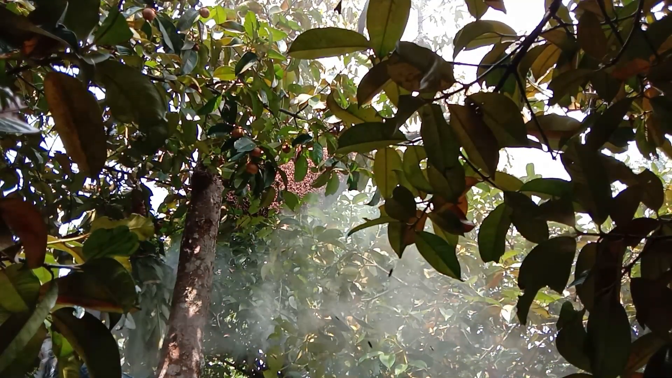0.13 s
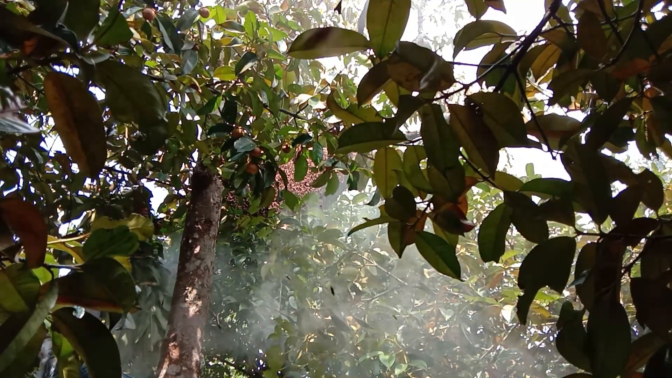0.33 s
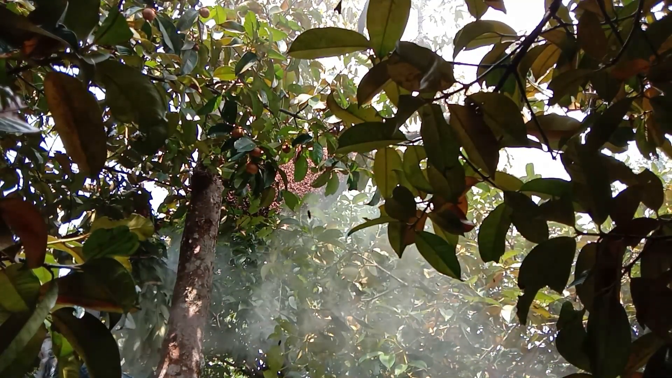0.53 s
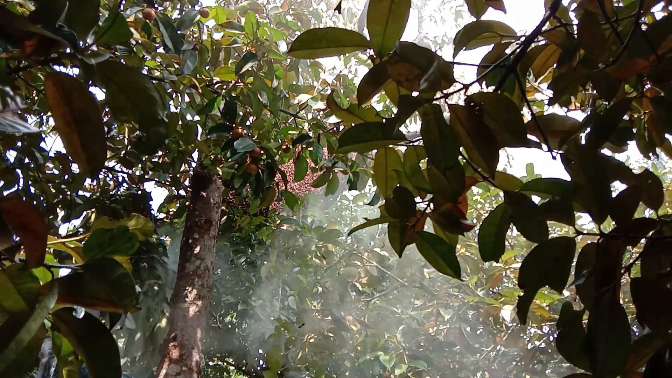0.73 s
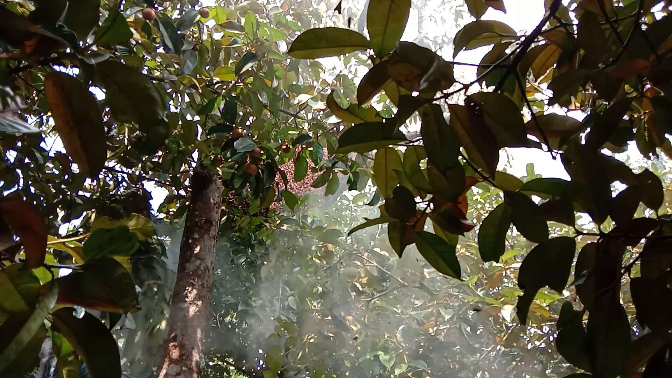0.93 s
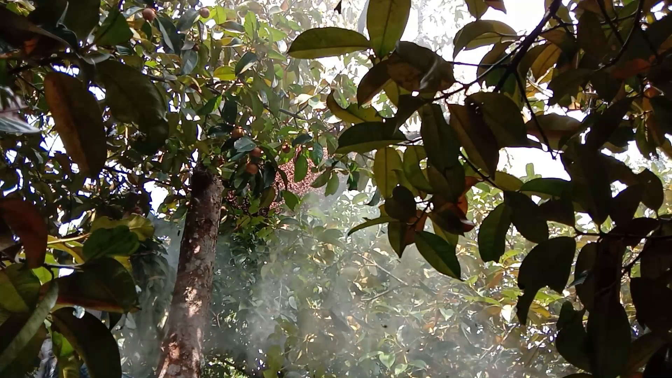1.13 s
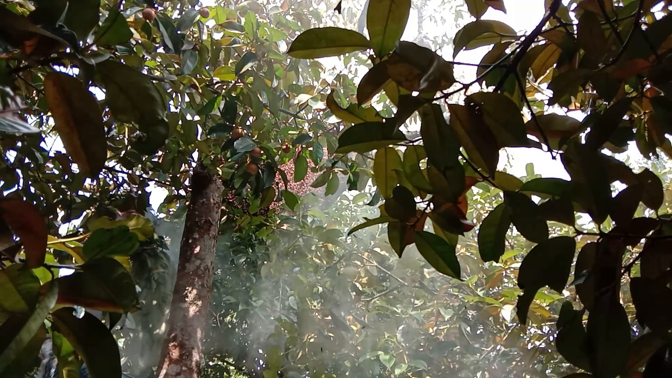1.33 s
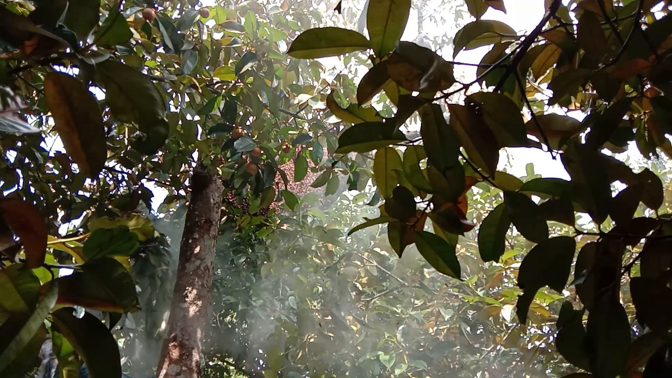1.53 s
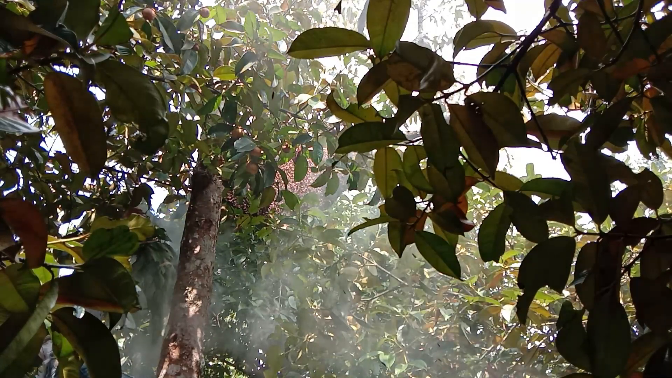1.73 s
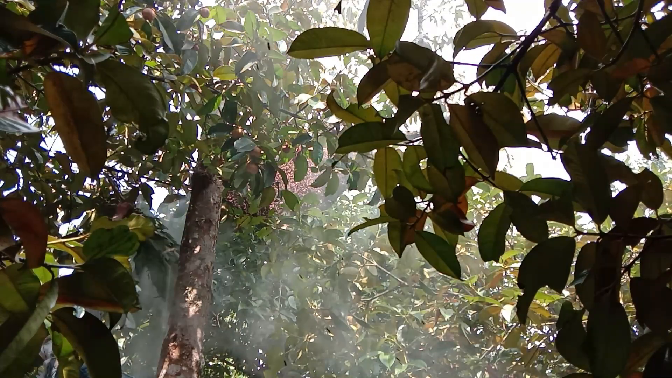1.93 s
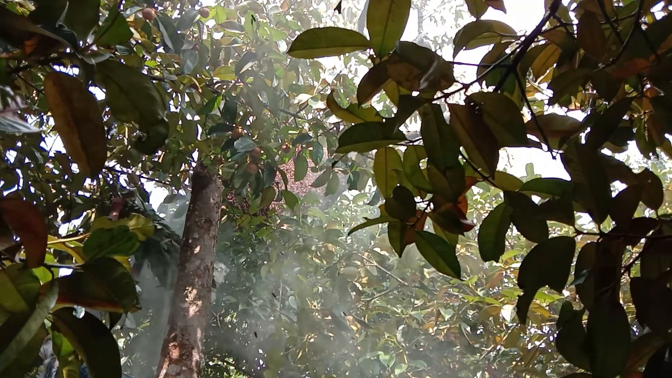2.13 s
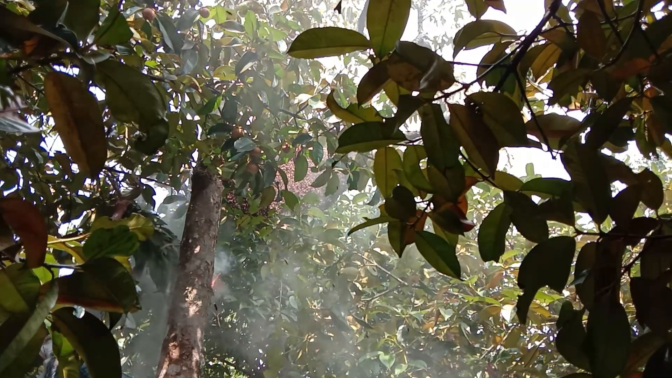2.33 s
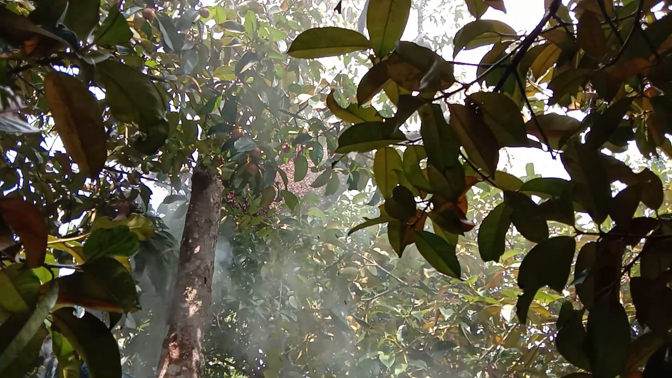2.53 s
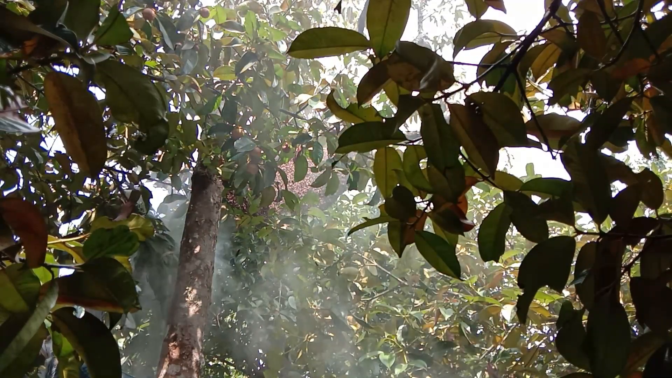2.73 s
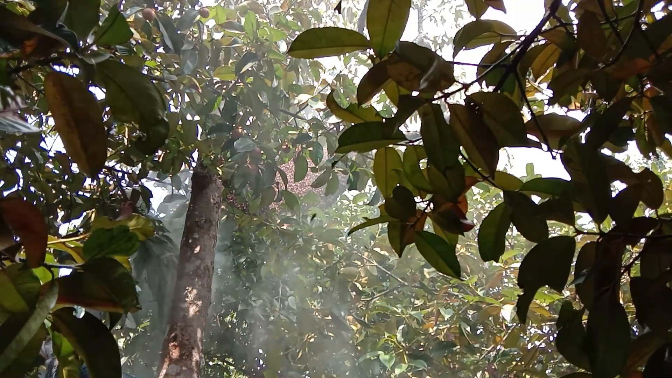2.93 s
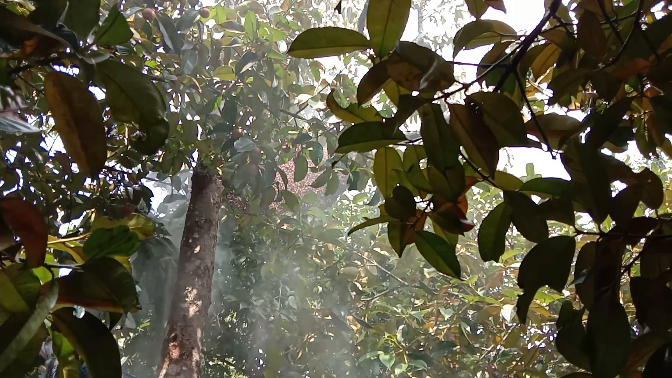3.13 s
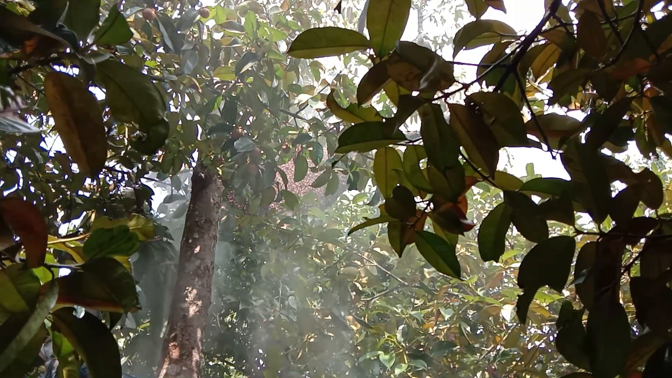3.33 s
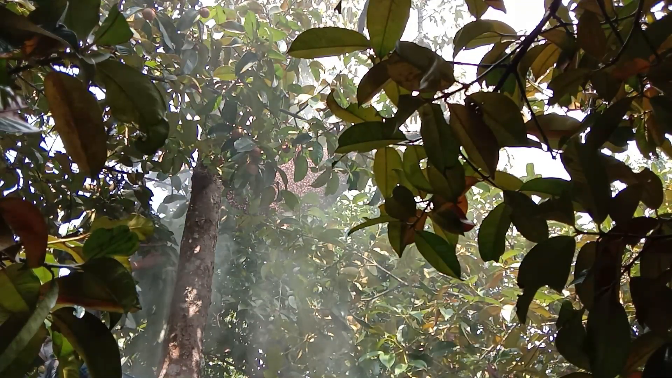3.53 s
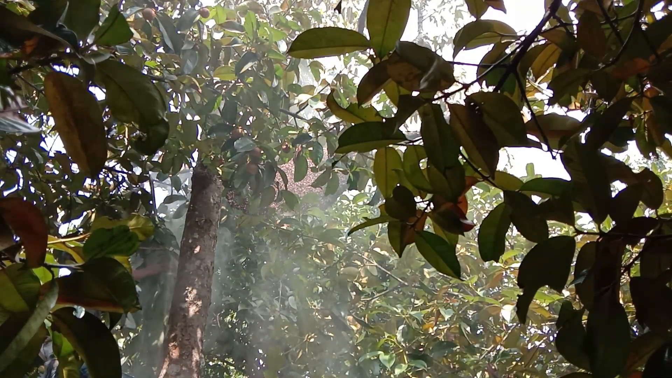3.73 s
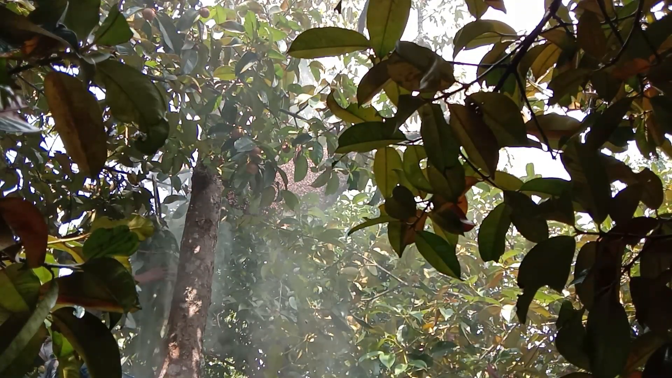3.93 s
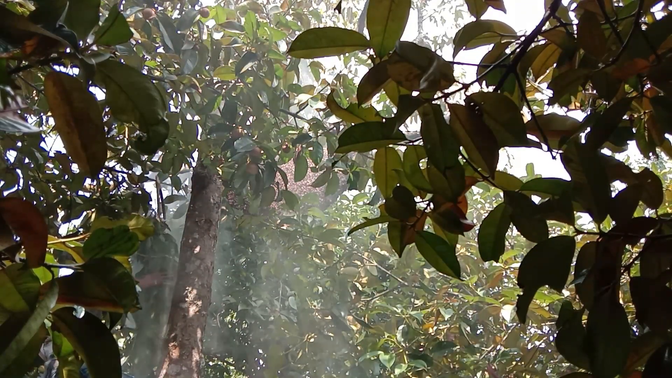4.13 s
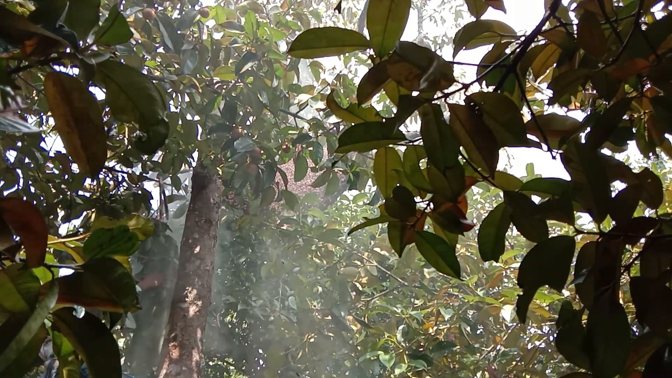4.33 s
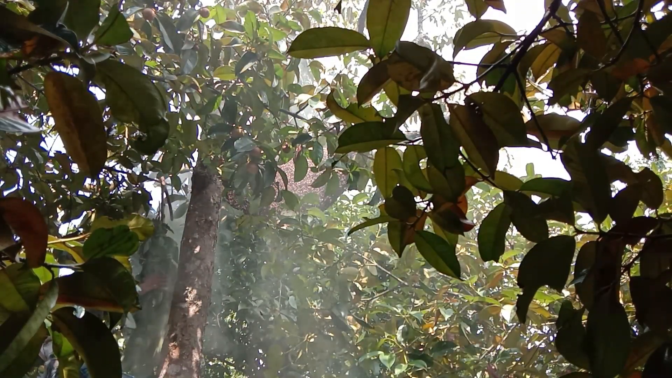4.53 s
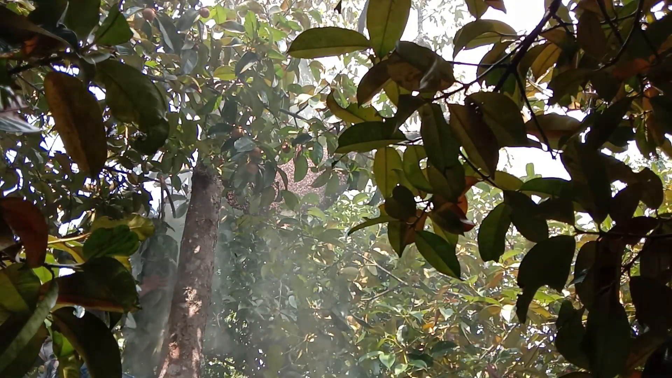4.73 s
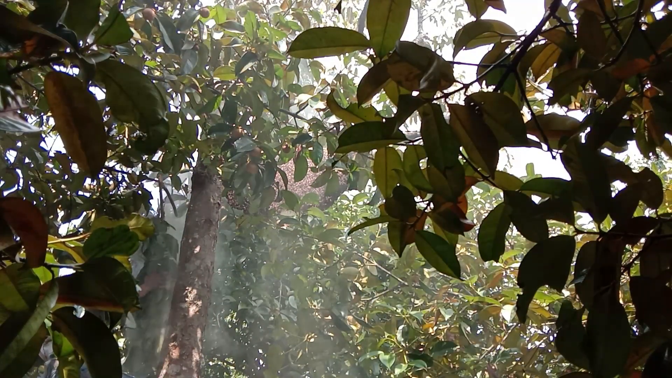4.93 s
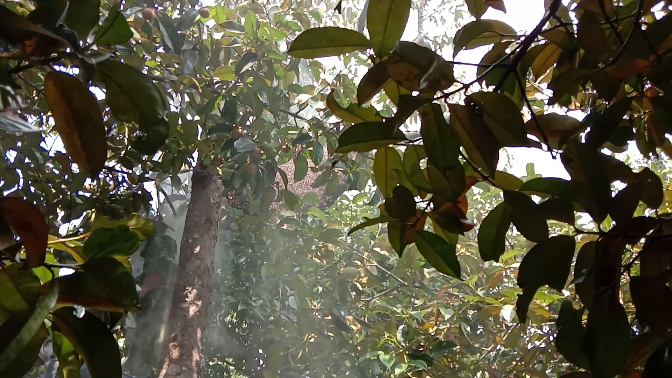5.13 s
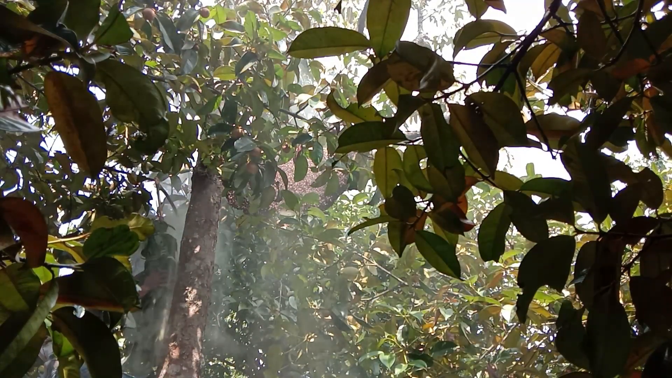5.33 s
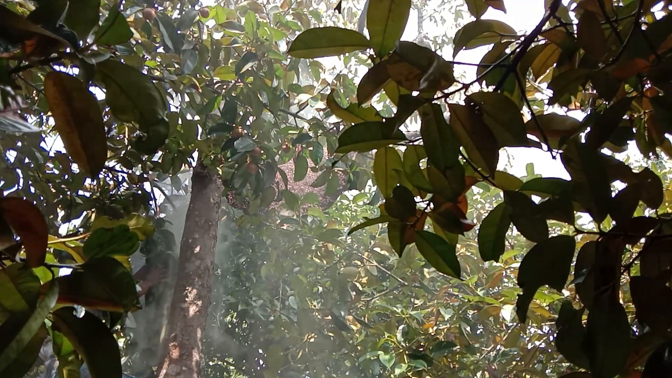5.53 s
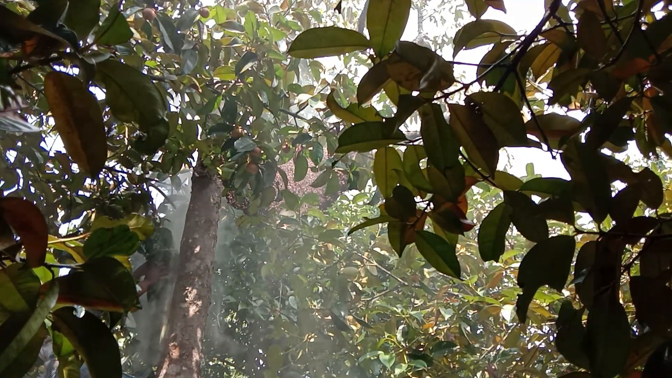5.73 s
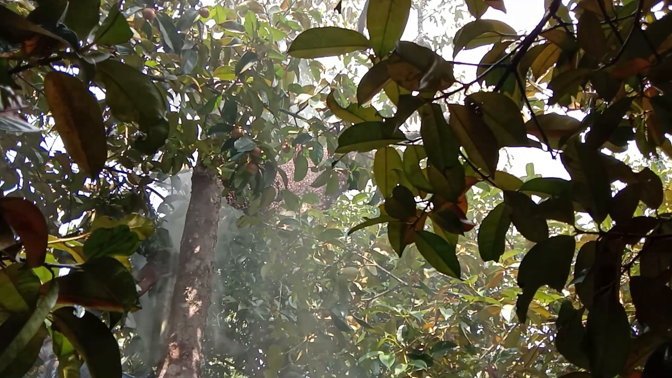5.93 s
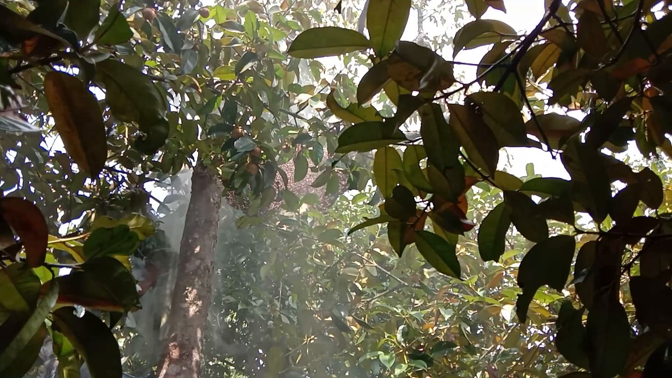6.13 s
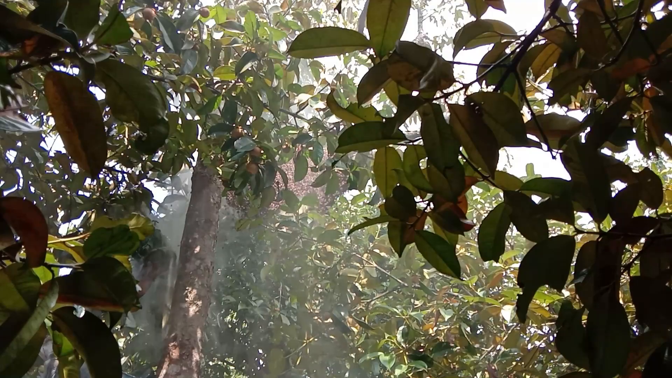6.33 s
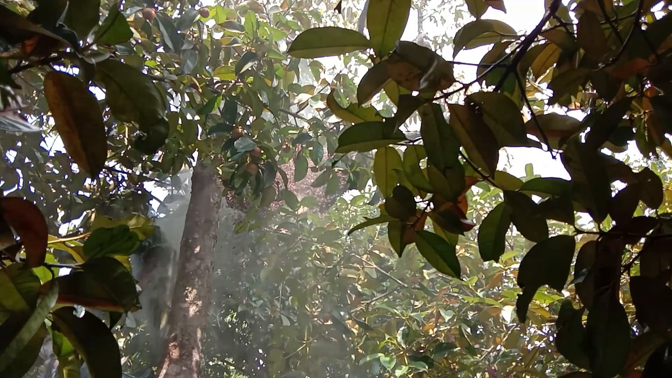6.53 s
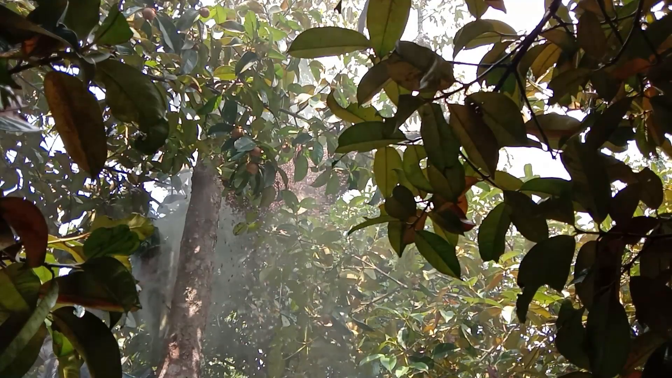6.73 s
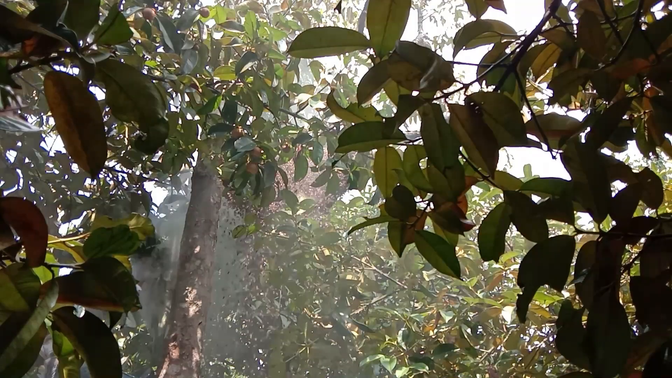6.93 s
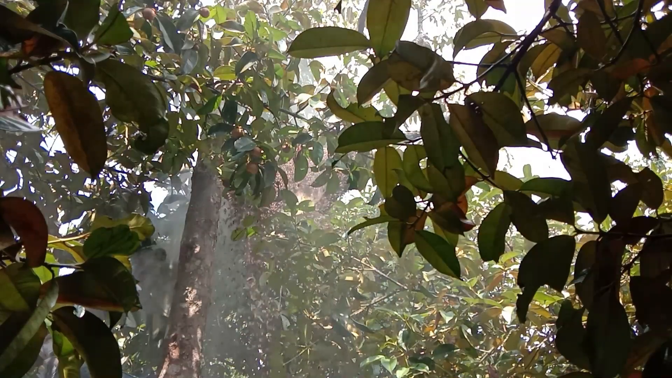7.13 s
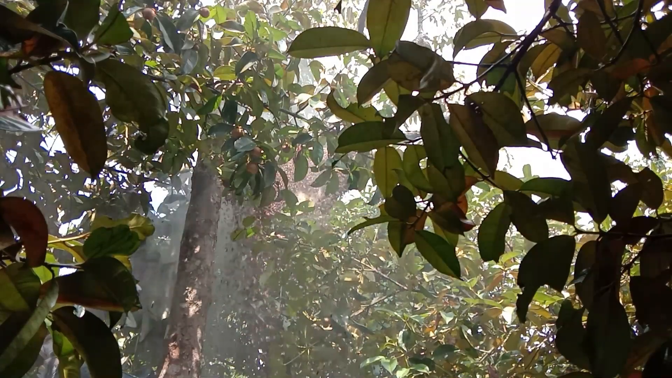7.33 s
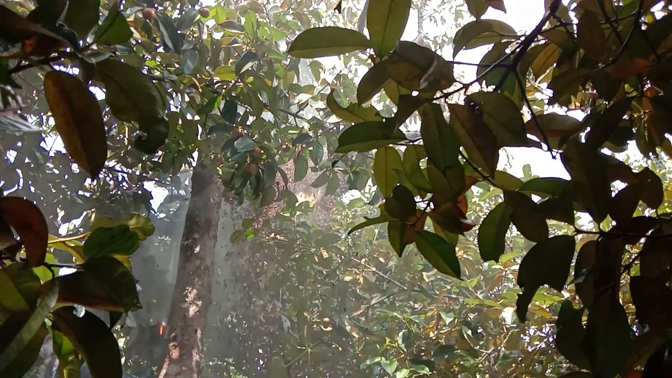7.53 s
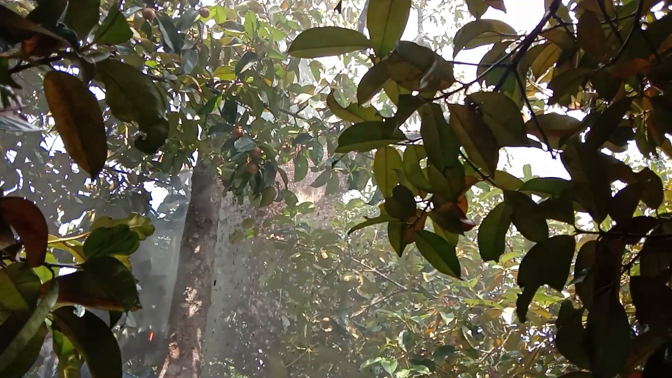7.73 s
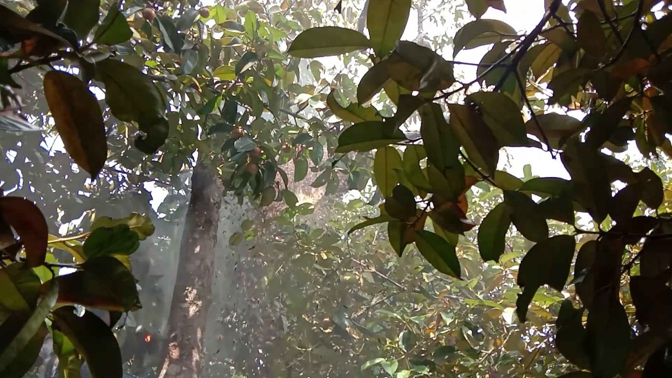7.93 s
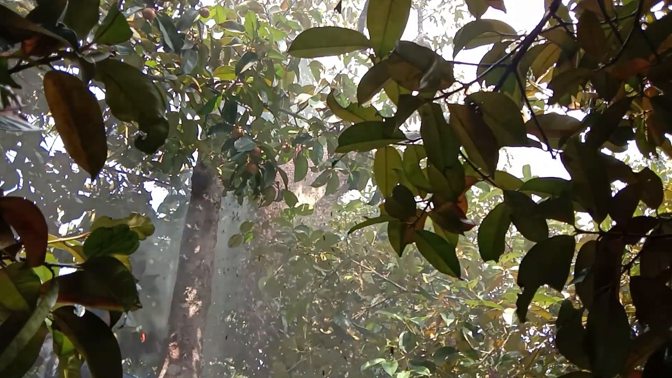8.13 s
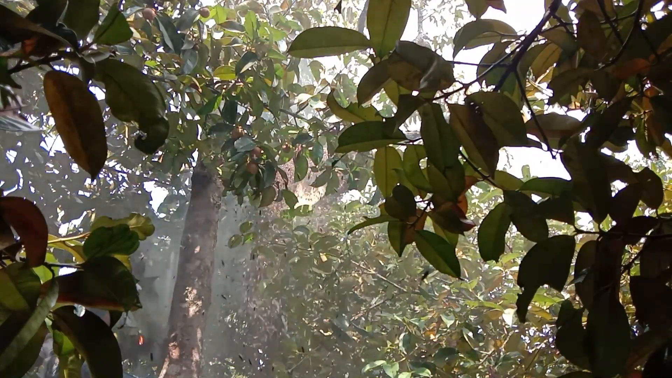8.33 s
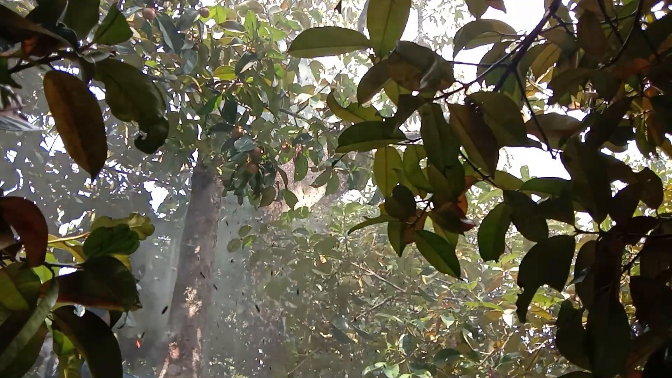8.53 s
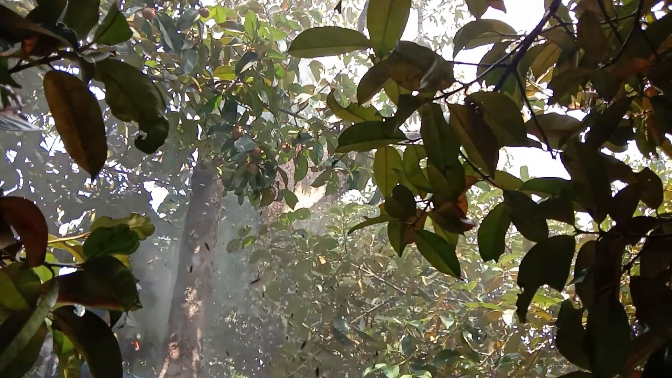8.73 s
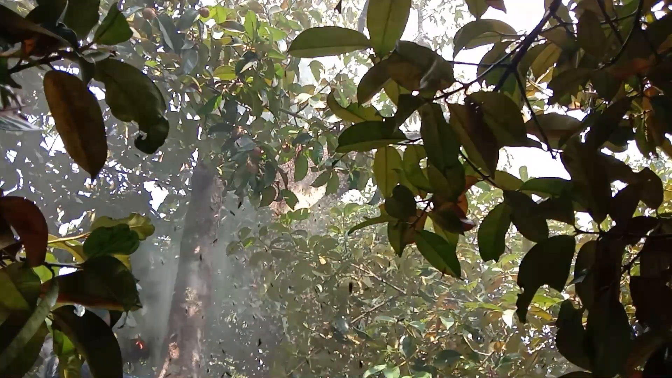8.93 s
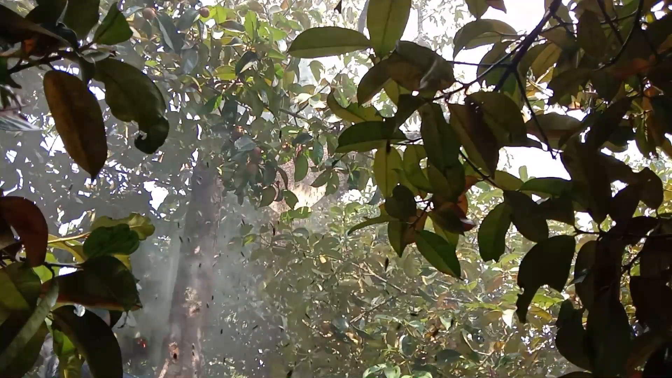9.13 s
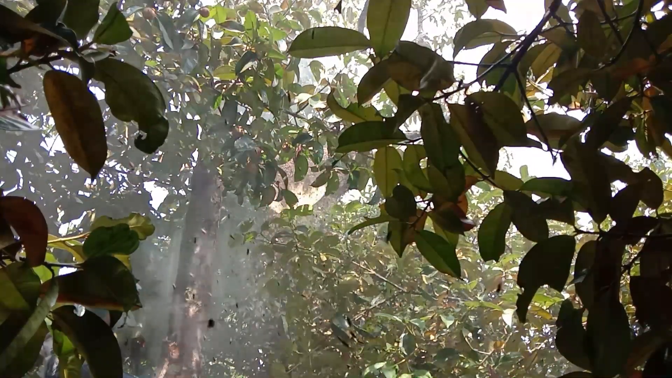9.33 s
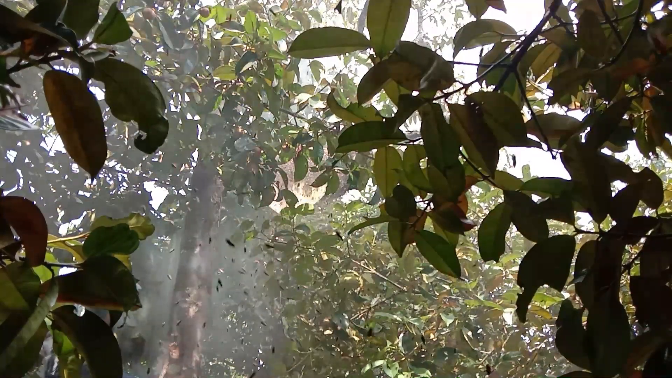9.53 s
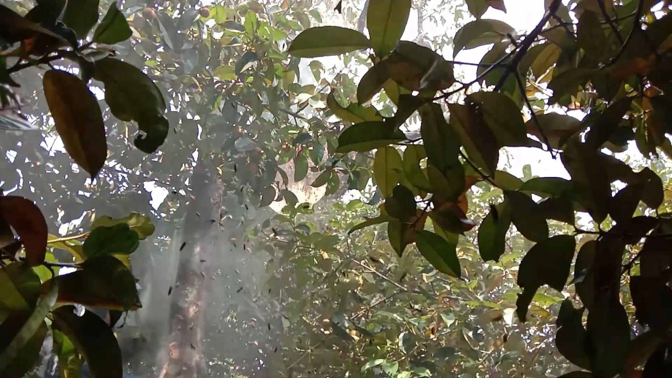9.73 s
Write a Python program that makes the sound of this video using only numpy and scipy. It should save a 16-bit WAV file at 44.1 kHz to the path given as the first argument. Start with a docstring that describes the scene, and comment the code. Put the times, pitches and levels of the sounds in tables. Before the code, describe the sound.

In a smoky forest, faint air, a low distant engine and a soft bee hum lie under dry crackles and snapping twigs. Around one second wood creaks, then a tiny whistle and hollow knocks follow. From about five and a half seconds the swarm stirs in bursts, swelling to a loud hissing buzz that stays to the end. Outdoor handheld microphone, nearly mono.

```python
"""High in a forest tree hangs a swarm of large honey bees; smoke drives it off the nest and it swells into a roar.
Detuned wing tones near 138 Hz make the hum; filtered noise and ringing ticks make the hiss of bodies on leaves.
Behind them: noise for air and an insect chorus, summed multiples of a far engine's firing rate, noise puffs
for snaps in dry leaves, ringing twigs, hollow knocks, a creaking scrape of ringing wood, and one short whistle."""
import sys
import numpy as np
from scipy import signal
from scipy.fft import rfft, irfft, next_fast_len
from scipy.io import wavfile
from scipy.ndimage import uniform_filter1d

SR = 44100
rng = np.random.default_rng(int(sys.argv[2]) if len(sys.argv) > 2 else 0)


def store_wav(level_fs):
    """Save 16-bit WAV to argv[1]."""
    pcm = np.round(np.clip(np.atleast_2d(level_fs), -1, 1) * 32767)
    wavfile.write(sys.argv[1], SR, pcm.T.astype(np.int16))


def level_to_linear(level):
    """Convert decibel levels to linear amplitude factors, elementwise."""
    exponent = np.asarray(level, float) / 20
    return 10 ** exponent


N = 436149

# Snaps in dry leaves. Each row: start in seconds, level in dB, body pitch in Hz,
# body level re the 6.5-9 kHz part in dB, level above 9 kHz re the same in dB.
LEAF_SNAPS = [(0.016, -34, 3780, -8, -13), (0.045, -43, 3970, 0, -22), (0.227, -43.5, 3240, -5, -20),
              (0.253, -36, 2940, -2.5, -32), (0.336, -35, 3400, -4.5, -21), (0.414, -40.5, 2400, -1, -20),
              (0.433, -48, 1890, 2, -27), (0.9094, -42, 4200, -0.5, -9), (1.557, -27.5, 4300, 0, -15),
              (1.735, -33, 3580, 0, -14), (1.8492, -38, 5920, -14, -19), (1.8786, -36, 5940, -1.5, -23),
              (2.002, -39, 3700, -1.5, -23), (2.067, -42, 5960, -28.5, -28), (2.2136, -45, 3950, 0, -30),
              (2.369, -34.5, 5950, -3.5, -0.5), (2.5441, -44, 4060, -21, -15), (3.3692, -45, 4280, -6, -4),
              (3.632, -42.5, 2690, -4, -22), (3.669, -38, 3480, -4, -23), (3.777, -38, 5630, -4, -24),
              (3.867, -41, 4790, -7, -21), (4.496, -32.5, 4600, -4.5, -16), (4.514, -47, 4030, -5, -15),
              (4.5323, -37, 4960, -9, -13), (4.59, -39, 5500, -10, -15), (4.612, -42, 5520, -20, -13),
              (4.7348, -36.5, 5950, -6, -10), (5.016, -34.5, 5400, -6, -16), (5.076, -46, 3270, 6, -22),
              (5.3213, -45, 5450, -2, -20), (5.5023, -35, 6170, -21, -10), (5.7633, -28, 5530, -11, -9),
              (5.812, -32, 6050, -14, -3), (5.858, -40, 2600, 3, -19.5), (5.984, -32.5, 2800, -7, -20),
              (6.2884, -34.5, 3170, -1, -20), (6.3668, -32, 5780, -5, -20), (6.4556, -39, 5490, -6, -20),
              (6.9734, -29, 4910, -13, -20)]


def in_time(rows):
    """Interpolates each column of a table over time, one value per sample."""
    s, *columns = np.transpose(rows)
    return [np.interp(np.arange(N) / SR, s, c) for c in columns]


def rms_one(x):
    """Scales to rms 1."""
    return x / np.sqrt(np.mean(x ** 2) + 1e-20)


def drift(rate_hz, step=1):
    """Slow noise of spread 1: double one-pole low-pass at every 40th sample, read every step samples."""
    r = np.exp(-2 * np.pi * rate_hz * 40 / SR)
    slow = signal.lfilter([1], [1, -2 * r, r * r], rng.standard_normal(N // 40 + 4002))
    slow = slow[4000:]   # run in
    return np.interp(np.arange(0, N, step) / 40, np.arange(len(slow)), rms_one(slow - slow.mean()))


def band(x, low_hz, high_hz, order=2):
    """Butterworth band-pass."""
    return signal.sosfilt(signal.butter(order, [low_hz, high_hz], "band", fs=SR, output="sos"), x)


def noise_band(low_hz, high_hz):
    """Band of white noise; rms 1."""
    return rms_one(band(rng.standard_normal(N), low_hz, high_hz))


def coloured(x, spectrum):
    """Multiplies the spectrum of x by a (Hz, dB) table, read over log frequency; rms 1."""
    size = next_fast_len(N)
    hz, db = np.transpose(spectrum)
    shape_db = np.interp(np.log(np.arange(size // 2 + 1) * SR / size + 1), np.log(hz), db)
    return rms_one(irfft(rfft(x, size) * level_to_linear(shape_db), size)[:N])


def patchy(white, lowest_hz, depth_db, rate_hz, count):
    """Each octave gets passing clumps of its own."""
    for low_hz in lowest_hz * 2. ** np.arange(count):
        white = white + (level_to_linear(depth_db * drift(rate_hz)) - 1) * band(white, low_hz, 2 * low_hz)
    return white


def ring(clicks, hz, t60_s):
    """Two-pole resonator: a unit click starts a decaying sine of height about 1."""
    r, w = level_to_linear(-60 / (t60_s * SR)), 2 * np.pi * hz / SR
    return signal.lfilter([0, np.sin(w)], [1, -2 * r * np.cos(w), r * r], clicks + 1e-18)


def stroke_db(s, db, rise_db_per_s, hold_s, fall_db_per_s):
    """A level that climbs to db at s, holds, then falls."""
    t = np.arange(N) / SR - s
    return db + rise_db_per_s * np.minimum(t, 0) - fall_db_per_s * np.maximum(t - hold_s, 0)


def forest_air():
    """Air rumbles and murmurs unevenly: coloured noise with clumps in each octave."""
    # Each row: frequency in Hz, relative level in dB per Hz.
    air_spectrum = [(30, -30), (60, -16), (100, -2.5), (160, -1.5), (300, -11.5), (600, -14), (1000, -18),
                    (1600, -21), (3000, -73), (9000, -31), (16000, -41)]
    white = patchy(rng.standard_normal(N), 52.7, depth_db=5.0, rate_hz=16.0, count=4)
    return level_to_linear(-46) * coloured(white, air_spectrum)


def insect_chorus():
    """A far chorus blurs into one noise band that wavers and swells once, briefly."""
    centre_hz, width_hz, level_db = 7810, 1120, -55
    swell_s, swell_length_s, swell_db = 1.09, 0.064, 8
    swell = np.exp(-((np.arange(N) / SR - swell_s) / swell_length_s) ** 2)
    gain = level_to_linear(level_db + 2.0 * drift(5.0) + swell_db * swell)
    return gain * noise_band(centre_hz - width_hz / 2, centre_hz + width_hz / 2)


def engine(size=10):
    """Multiples of a slow firing rate; all flutter, and each fades on its own on the way through the trees."""
    # Each row: time in seconds, firings per second.
    firing_rate = [(0, 31), (.55, 33.3), (1.2, 31), (2.3, 32.6), (3.6, 31.4), (5.2, 30.7), (6.1, 33.7),
                   (6.8, 35), (7.6, 35.6), (8.7, 36.8), (9.89, 37)]
    # Each row: time in seconds, level in dB, lift of multiples above the 10th (load) in dB.
    load = [(0, -53, -18), (1, -41, -11), (2.3, -50, 2.5), (3.3, -44, 3), (3.6, -40.5, -3.5),
            (4.5, -42, -8.5), (5.1, -41, -9.5), (5.5, -48, 5.5), (6.2, -46, -21), (7.5, -45, -19),
            (8.7, -40.5, -19), (9.89, -35, -13)]
    # Each row: multiple of the firing rate, relative level in dB.
    orders = [(1, -34), (2, -16.5), (3, -12.5), (4, 1), (5, -3), (6, -7), (7, -5.5), (8, -5), (9, -11.5),
              (10, -14.5), (11, -10.5), (12, -5), (13, -4), (14, -16), (15, -20)]
    pipe_hz, pipe_width_hz, pipe_db = 175, 14, 8
    per_s, db, lift_db = [column[::size] for column in in_time(firing_rate) + in_time(load)]
    turns = np.cumsum(per_s * (1 + 0.0013 * drift(3.1, size))) * size / SR
    out = 0
    for k, order_db in orders:
        # the exhaust favours the multiple that crosses its pitch
        favour_db = pipe_db * np.exp(-((k * per_s - pipe_hz) / pipe_width_hz) ** 2)
        gain = level_to_linear(order_db - 7.0 + 3.9 * drift(6.9, size) + lift_db * (k > 10) + favour_db)
        phase = 0.96 * rng.standard_normal()   # multiples of one pulse keep roughly in step
        out = out + gain * np.cos(2 * np.pi * round(k) * turns + phase)
    return signal.resample_poly(level_to_linear(db + 1.5 * drift(4.0, size)) * out, size, 1)[:N]


def whistle():
    """A short breathy note drops into pitch and flutters; a rough lower tone sounds with its start."""
    start_s, hz, lower_hz = 1.385, 2640, 1680
    t = np.arange(N) / SR - start_s
    db = stroke_db(start_s, -46, rise_db_per_s=260, hold_s=0.012, fall_db_per_s=170)
    pitch_hz = hz + 22 * drift(48) - 900 * np.clip(t, -.05, 0)
    tone = (1 + .35 * drift(90)) * np.sin(2 * np.pi * np.cumsum(pitch_hz) / SR)
    breath = 0.41 * noise_band(hz - 150, hz + 150)
    lower_swell = level_to_linear(-49) * np.exp(-((t + 0.02) / 0.021) ** 2)
    return level_to_linear(db) * (tone + breath) + lower_swell * noise_band(lower_hz - 200, lower_hz + 200)


def scrape():
    """Uneven small slips and separate hard ones set wood ringing; a trailing rasp stirs its upper modes."""
    # Hardest slips. Each row: time in seconds, relative level in dB.
    slips = [(1.047, -43), (1.053, -37), (1.061, -27), (1.074, -40), (1.086, -31), (1.096, -23),
             (1.108, -23), (1.114, -29), (1.122, -24), (1.129, -30), (1.141, -26), (1.1458, -19),
             (1.158, -26), (1.181, -25), (1.187, -18), (1.201, -30), (1.207, -35), (1.2613, -39),
             (1.277, -32), (1.298, -37)]
    # Modes of the wood. Each row: frequency in Hz, relative level in dB, t60 in seconds.
    wood = [(1224, 3.5, 0.018), (1496, 10, 0.021), (1730, 2, 0.02), (2210, -8, 0.024), (2980, -17, 0.025),
            (3420, -15, 0.015), (4220, -24, 0.045)]
    slip_build_s, rasp_late_s = 0.00079, 0.024
    born = rng.random(N) < 500 / SR
    at_s, slip_db = np.transpose(slips)
    at = ((at_s - slip_build_s) * SR).astype(int)
    pressure_db = stroke_db(1.105, -38.5, rise_db_per_s=220, hold_s=0.09, fall_db_per_s=150)
    dense, hard, rasp = 0, 0, 0
    for hz, db, t60_s in wood:
        dense = dense + ring(born * rng.standard_normal(N) * level_to_linear(db), hz, t60_s)
        clicks = np.zeros(N)
        clicks[at] = level_to_linear(slip_db + db - 13.5 + 1.5 * rng.standard_normal(len(at)))
        hard = hard + ring(clicks, hz, t60_s)
        stirred = rms_one(ring(rng.standard_normal(N), hz, 0.033))
        rasp = rasp + (hz > 2000) * level_to_linear(4.6 * drift(19)) * stirred
    rasp = level_to_linear(-8.0) * (rms_one(rasp) + 0.74 * noise_band(2000, 4800))
    late = level_to_linear(np.roll(pressure_db, round(rasp_late_s * SR)))   # the rasp trails the pressure
    return level_to_linear(pressure_db) * rms_one(dense) + late * rasp + band(hard, 1100, 2300)


def knocks():
    """A few cycles swell and fade, and excite a hollow that rings on after them."""
    # Each row: centre in seconds, level in dB, pitch in Hz, length in seconds (1/e width).
    knock_rows = [(1.56, -24.5, 350, 0.0066), (1.731, -31, 250, 0.0074), (1.738, -11, 333, 0.0055),
                  (2.024, -37, 197, 0.0077), (6.421, -23.5, 447, 0.0033)]
    out, t = np.zeros(N), np.arange(-SR // 20, SR // 20) / SR
    for s, db, hz, length_s in knock_rows:
        at = round(s * SR) - SR // 20
        out[at:at + len(t)] += level_to_linear(db) * np.exp(-(t / length_s * 2) ** 2) * np.cos(2 * np.pi * hz * t)
    return out + level_to_linear(-58) * ring(out, hz=252, t60_s=0.39)


def twig_ticks():
    """A thin twig breaks cleanly: a crack, its pitch and a close partner ringing briefly."""
    # Each row: start in seconds, level in dB, pitch in Hz, t60 in seconds.
    twigs = [(.045, -34, 7650, .02), (0.417, -39, 1660, .12), (.0214, -40, 3780, .1),
             (.3356, -44, 7700, .03), (.228, -43, 3200, .02), (0.261, -39, 1350, 0.08),
             (.384, -46, 1250, 0.18), (0.415, -39, 1200, 0.087), (.415, -40, 7400, 0.036),
             (0.4142, -37, 2640, .07), (1.733, -34, 1630, .08), (2.067, -35, 7500, 0.027),
             (2.2134, -38, 7500, .03), (3.6725, -47, 3180, 0.027), (3.8673, -36, 4600, 0.045),
             (4.7335, -38, 7100, .04), (5.077, -36, 3250, .04), (5.762, -36, 7650, 0.043),
             (5.984, -30, 3600, .02)]
    out = np.zeros(N)
    for s, db, hz, t60_s in twigs:
        click = np.zeros(SR // 4)
        click[0] = level_to_linear(db)
        partner = level_to_linear(-16.0) * ring(click, hz * 1.09, t60_s)
        crack = level_to_linear(-4.0) * ring(click, hz * 0.83, 0.0035)
        at = round(s * SR)
        out[at:at + len(click)] += ring(click, hz, t60_s) + partner + crack
    return out


def snaps():
    """A sharp tick, then a crackling noise puff that dies away, with a body pitch of its own."""
    # Edges in Hz of the low, middle and high noise bands.
    edges_hz = [1000, 6500, 9000, 15500]
    crackles_per_s, crackle_db = 230, 12.5
    white = patchy(rng.standard_normal(N), 1200, depth_db=1.0, rate_hz=19, count=3) * level_to_linear(0.82 * drift(130))
    white = white + (rng.random(N) < crackles_per_s / SR) * level_to_linear(crackle_db) * rng.standard_normal(N)
    white[(np.array(LEAF_SNAPS)[:, 0] * SR).round().astype(int) + 2] = 6.8   # the break itself
    low, middle, high = [rms_one(band(white, a, b, order=4)) for a, b in zip(edges_hz, edges_hz[1:])]
    out, t = np.zeros(N), np.arange(SR // 4) / SR
    for s, db, body_hz, body_db, high_db in LEAF_SNAPS:
        at = round(s * SR)
        span = slice(at, at + len(t))
        t60_s = max(.18 + .005 * (db + 35), .02)   # harder snaps ring longer
        puff = (1 - np.exp(-t / (0.028 * t60_s))) * level_to_linear(-60 * t / t60_s)   # long puffs also start softer
        shape = puff / puff.max() + 0.87 * np.exp(-t / 0.0021)
        pitched = rms_one(band(white[span], body_hz * 0.63, body_hz * 1.4))
        body = rms_one(0.4 * low[span] + pitched)
        mix = level_to_linear(body_db) * body + middle[span] + level_to_linear(high_db) * high[span]
        out[span] += level_to_linear(db - 6.5) * shape * mix
    return out


def leaves(snap):
    """Dry leaves ring briefly at many pitches: shaken by each snap, and flicked at random in clumps."""
    rustles_per_s, rustle_db, ring_cycles, shaken_db = 140, -57, 25, 3
    out, at = 0, (np.array(LEAF_SNAPS)[:, 0] * SR).astype(int)
    pitches_hz = np.geomspace(1000, 7500, 16)
    strengths_db = np.clip(rng.normal(0, 33.0, (len(at), len(pitches_hz))), None, 4.0)
    latest = np.clip(np.searchsorted(at, np.arange(N), "right") - 1, 0, None)   # which snap is sounding
    born = rng.random(N) < rustles_per_s * level_to_linear(5.0 * drift(4)) / SR
    flicks = born * level_to_linear(rustle_db + 5.5 * np.minimum(rng.exponential(1, N), 2.5))
    dealt = rng.integers(0, len(pitches_hz), N)
    for k, hz in enumerate(pitches_hz):
        t60_s = ring_cycles / hz
        resonance = 7 / (t60_s * SR)   # gain near 1 on top
        shaken = level_to_linear(shaken_db + strengths_db[:, k])[latest] * snap * resonance
        out = out + ring(shaken + flicks * (dealt == k), hz, t60_s)
    return out


def hiss(brushing_db):
    """Bodies brush leaves: many small ticks, each ringing a leaf pitch, over smooth wing noise."""
    # Each row: frequency in Hz, relative level in dB per Hz.
    hiss_spectrum = [(40, -29), (80, -15.5), (180, -3.5), (400, -2), (1000, -3.5), (2000, -4), (4000, -1.5),
                     (6000, -1), (8500, -5), (10000, -12), (12500, -15.5), (16000, -13)]
    ticks_per_s, ring_cycles, ring_db = 2500, 140, -5
    sizes = level_to_linear(1.98 * np.minimum(rng.exponential(1, N), 3.5)) * rng.choice([-1, 1], N)
    ticks = sizes * (rng.random(N) < ticks_per_s * level_to_linear(2.0 * drift(9)) / SR)
    pitches_hz = np.geomspace(1100, 11000, 48) * rng.uniform(.98, 1.02, 48)
    dealt = rng.integers(0, len(pitches_hz), N)
    rings = 0
    for k, hz in enumerate(pitches_hz):
        rings = rings + ring(ticks * (dealt == k), hz, ring_cycles / hz) * hz
    white = rng.standard_normal(N) + 0.32 * rms_one(ticks) + level_to_linear(ring_db) * rms_one(rings)
    white = white * level_to_linear(0.31 * drift(5.1) + 0.5 * drift(44))
    white = patchy(white, 510, depth_db=0.43, rate_hz=7.5, count=4)
    return level_to_linear(brushing_db - 1.2) * coloured(white, hiss_spectrum)


def wing_levels(flying_db):
    """Levels of second multiple and fundamental, with swells and dips of the low hum as its tones beat."""
    # Swells and dips. Each row: centre in seconds, length in seconds (1/e width),
    # change of the second multiple in dB, change of the fundamental in dB.
    beats = [(0.358, 0.063, -9, 18), (0.493, 0.056, 11.5, -2), (0.91, 0.11, -6.5, 12),
             (1.492, 0.31, 1.5, 13), (2.025, 0.031, -1, 19), (2.784, 0.046, -2, 13), (3.76, 0.06, 5, 2),
             (5.397, 0.2, 3, 11), (5.78, 0.069, 9.5, 10), (5.883, 0.089, 13, 11), (6.122, 0.15, 16.5, -3),
             (6.236, 0.073, 6.5, 12), (6.39, 0.062, 7, 11), (6.566, 0.11, 5.5, 3), (6.834, 0.057, 14, 3),
             (6.952, 0.12, 9.5, -2), (7.017, 0.038, -6, 8), (7.116, 0.16, 10.5, 15), (7.338, 0.065, 10, 21),
             (7.463, 0.094, 5, 17), (7.627, 0.083, 6, 15), (7.828, 0.02, 11, 4), (7.908, 0.083, 3, 8),
             (8.015, 0.052, 9.5, -13), (8.097, 0.086, -5, 6), (8.25, 0.13, 3, -3), (8.495, 0.12, 7, -6),
             (8.6, 0.13, -1, 6.5), (8.75, 0.36, 1, 4.5), (9.148, .2, 1, 3), (8.99, 0.24, 6.5, -3.5),
             (9.292, 0.1, 6, 5), (9.603, 0.11, 6, 0), (9.72, 0.13, 1, 9.5)]
    # the fundamental carries badly: faint from afar, full once bees fly close by
    far_db, close_db, close_s, closing_s = -56, -38.5, 7.95, 0.086
    waver_hz = 20
    t = np.arange(N) / SR
    close = .5 + .5 * np.tanh((t - close_s) / closing_s)
    upper_db = flying_db + 2.58 * drift(waver_hz)
    fundamental_db = far_db + (close_db - far_db) * close + 2.5 * drift(waver_hz)
    for s, length_s, upper_change_db, fundamental_change_db in beats:
        span = slice(max(round((s - 2 * length_s) * SR), 0), round((s + 2 * length_s) * SR))
        bump = np.exp(-((t[span] - s) / length_s * 2) ** 2)
        upper_db[span] += upper_change_db * bump
        fundamental_db[span] += fundamental_change_db * bump
    return upper_db, fundamental_db


def stack(hz, orders, step=1):
    """One cycle of the given multiples at chance phases, read round at the given pitch."""
    turn = np.arange(4097) / 4096
    cycle = sum(level_to_linear(db) * np.sin(2 * np.pi * (round(k) * turn + rng.random())) for k, db in orders)
    return cycle[(np.cumsum(hz) * step / SR % 1 * 4096).astype(int)]


def evened(x, low_hz, high_hz):
    """Divides by the slow level of one band, so that the swells and dips come as they are set."""
    power = uniform_filter1d(band(x, low_hz, high_hz) ** 2, size=SR // 24)
    return x / np.sqrt(power + 0.038 * power.mean())


def hum(flying_db, upper_db, fundamental_db, count=20, size=10):
    """Each bee has its own wing rate; its rate and level waver by chance."""
    # Wing tone. Each row: multiple of the wing rate, relative level in dB.
    wing = [(1, -1), (2, 0), (3, -17), (4, -7), (5, -9), (6, -9.5), (7, -26), (8, -23), (9, -15), (10, -21)]
    wing_hz, spread, waver = 137.6, .04, .024   # spread and waver: fractions of the rate
    out = 0
    for offset in np.linspace(-1.7, 1.7, count):   # low tones: one value per size samples is enough
        hz = wing_hz * (1 + spread * offset + waver * drift(4.0, size))
        gain = np.exp(-offset ** 2 / 4) * level_to_linear(4.5 * drift(4.0, size))
        out = out + gain * stack(hz, wing, size)
    out = signal.resample_poly(out, size, 1)[:N]
    fundamental = evened(band(out, 95, 185, order=3), 120, 160)
    upper = evened(band(out, 200, 350, order=3), 235, 320)
    higher = rms_one(band(out, 350, 2200, order=3))   # blurs into an even buzz
    return level_to_linear(flying_db - 2) * higher + level_to_linear(upper_db) * upper + level_to_linear(fundamental_db) * fundamental


def scene():
    """All sources, summed at the microphone."""
    # How stirred the swarm is. Each row: time in seconds, bodies brushing leaves in dB, bees on the wing in dB.
    swarm = [(0, -47.5, -47.5), (1, -49.5, -47.5), (2.3, -50, -49.5), (3, -51.5, -50), (3.6, -49, -53),
             (4.2, -52, -52.5), (5.49, -47, -52.5), (5.51, -45, -49), (5.62, -42, -49), (5.75, -40, -48.5),
             (5.8, -41, -49), (5.82, -33.5, -54), (5.85, -40, -48), (5.88, -32, -48), (5.93, -35, -52),
             (5.985, -33, -42), (6.01, -35.5, -43), (6.12, -33.5, -52), (6.155, -30.5, -56),
             (6.21, -34.5, -42), (6.3, -32, -45), (6.4, -30, -41), (6.9, -28.5, -42), (7.3, -25, -36.5),
             (7.8, -21.5, -34.5), (8.2, -19, -31.5), (9, -19.5, -31.5), (9.3, -21, -31.5), (9.6, -22, -32),
             (9.89, -22.5, -31)]
    brushing_db, flying_db = in_time(swarm)
    snap = snaps()
    out = forest_air() + insect_chorus() + engine()
    out = out + whistle() + scrape() + knocks() + twig_ticks() + snap + leaves(snap)
    out = out + hiss(brushing_db) + hum(flying_db, *wing_levels(flying_db))
    return np.array([out, out])   # the two ports sit close together and hear the same


def spreading_noise(channels):
    """Faint unrelated noise in each channel, which spreads the sound slightly."""
    # Each row: frequency in Hz, relative level in dB per Hz.
    noise_spectrum = [(30, -6), (60, 4), (100, 2), (300, 2), (1200, 1.5), (2500, -1), (5500, -3),
                      (7000, -19), (10000, -25), (12000, -14), (16000, -17)]
    return level_to_linear(-61) * np.array([coloured(rng.standard_normal(N), noise_spectrum) for _ in range(channels)])


def port(x):
    """Resonances of the microphone port: peaking filters in series, peaks and a notch."""
    # Each row: frequency in Hz, width in Hz, gain in dB.
    resonances = [(1250, 72, 9.5), (6200, 900, 2.5), (6590, 325, -9), (7530, 1280, 5.5)]
    for hz, width_hz, db in resonances:
        w, gain = 2 * np.pi * hz / SR, level_to_linear(db / 2)
        a = np.tan(np.pi * width_hz / SR)
        zeros = [1 + a * gain, -2 * np.cos(w), 1 - a * gain]
        poles = [1 + a / gain, -2 * np.cos(w), 1 - a / gain]
        x = signal.lfilter(zeros, poles, x)
    return x


def capsule(x):
    """The capsule lifts the top: adds the part above 14.8 kHz at a raised level."""
    top = signal.sosfiltfilt(signal.butter(12, 14800, "high", fs=SR, output="sos"), x)
    return x + level_to_linear(10.5) * top


def band_limit(x):
    """A steep low-pass at the top of the band."""
    return signal.sosfilt(signal.butter(12, 16870, fs=SR, output="sos"), x)


def record(dry):
    """Faint noise spreads the two channels; port and capsule colour them; a steep low-pass cuts the top."""
    spread = dry + spreading_noise(len(dry))
    lifted = capsule(port(spread))
    mix = signal.sosfilt(signal.ellip(14, .5, 85, 15470, fs=SR, output="sos"), lifted)
    return band_limit(mix)


dry = scene()
out = record(dry)
store_wav(out)
```